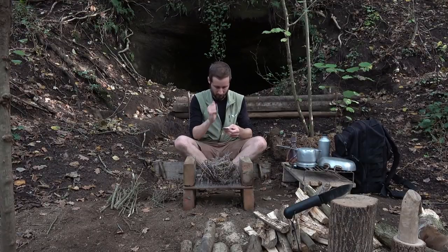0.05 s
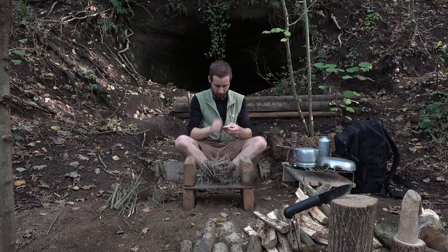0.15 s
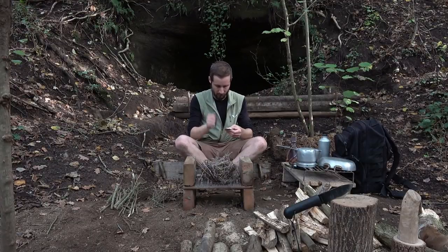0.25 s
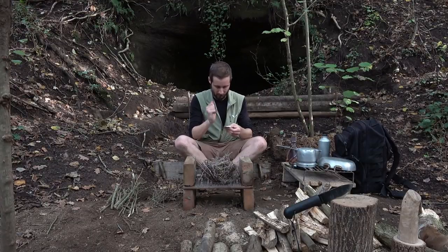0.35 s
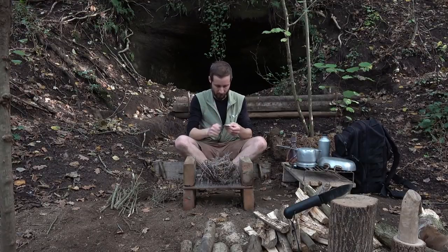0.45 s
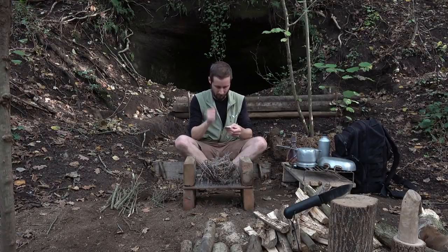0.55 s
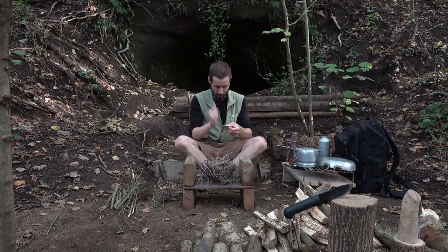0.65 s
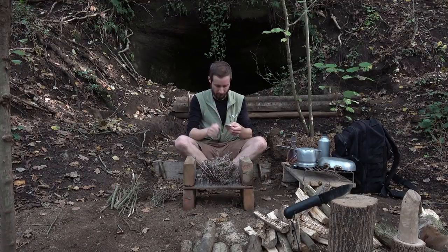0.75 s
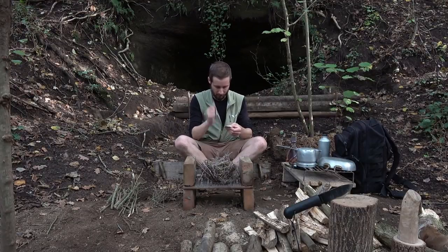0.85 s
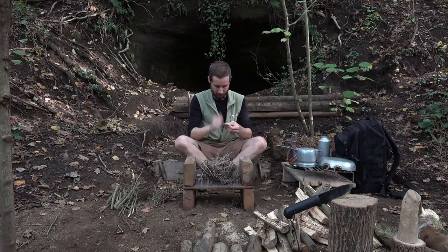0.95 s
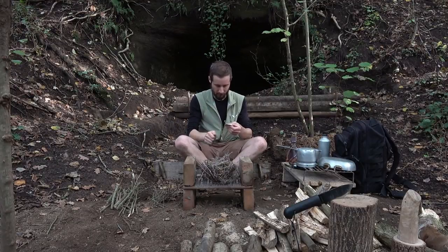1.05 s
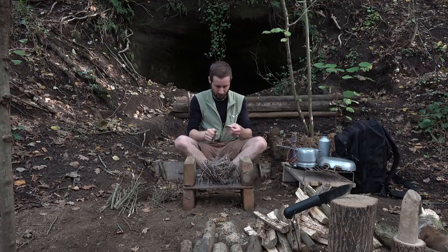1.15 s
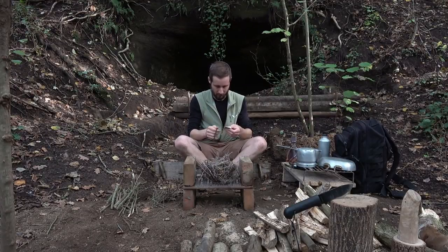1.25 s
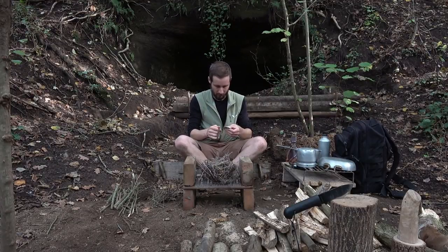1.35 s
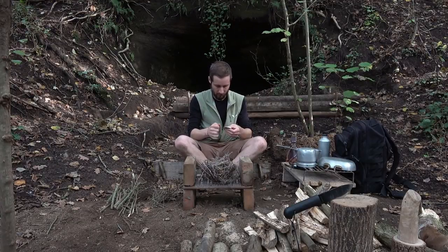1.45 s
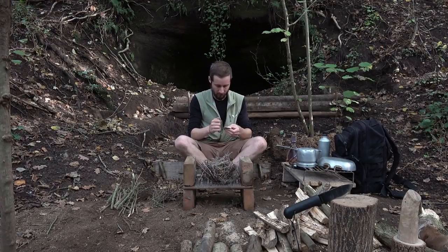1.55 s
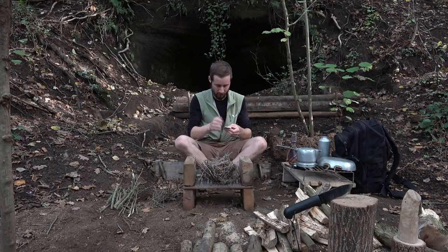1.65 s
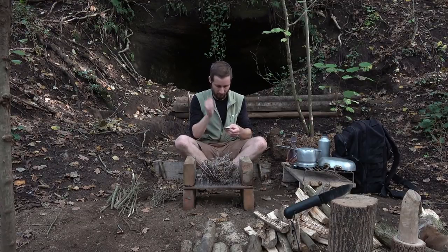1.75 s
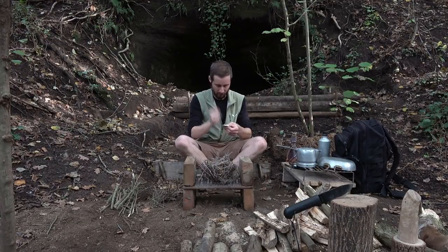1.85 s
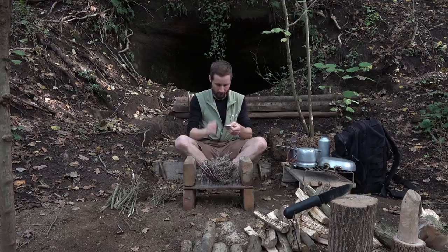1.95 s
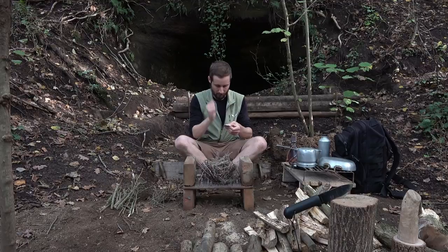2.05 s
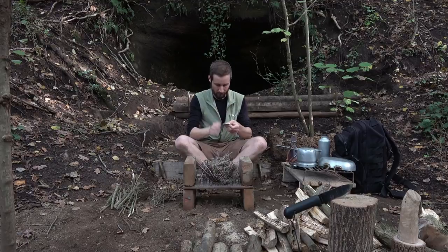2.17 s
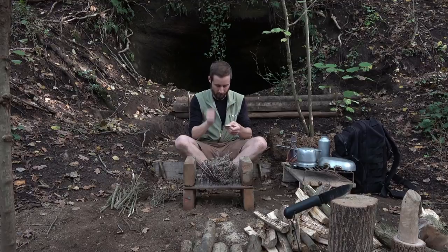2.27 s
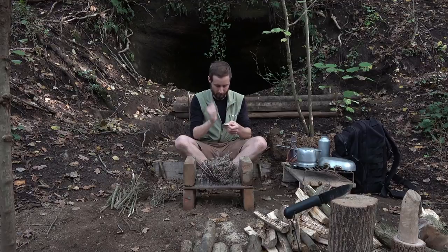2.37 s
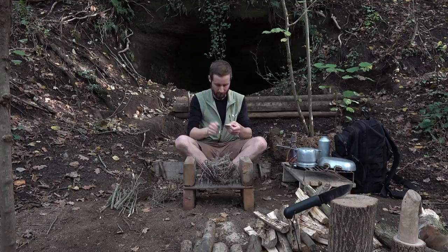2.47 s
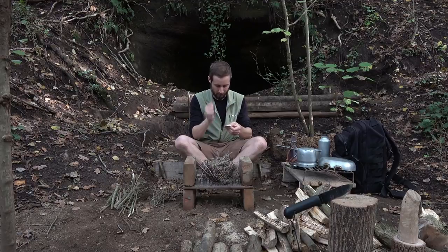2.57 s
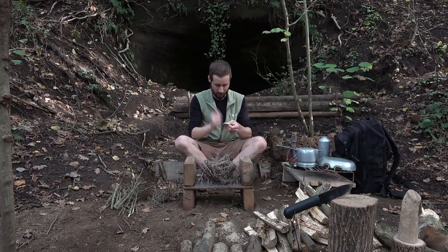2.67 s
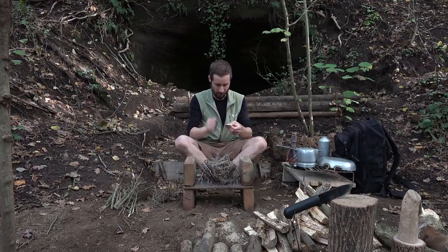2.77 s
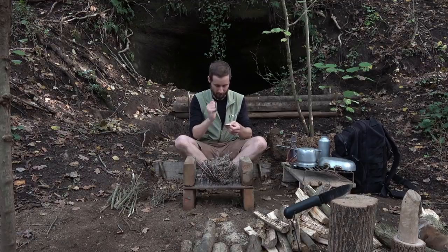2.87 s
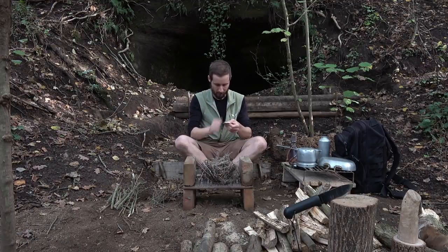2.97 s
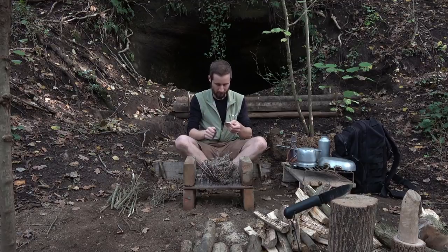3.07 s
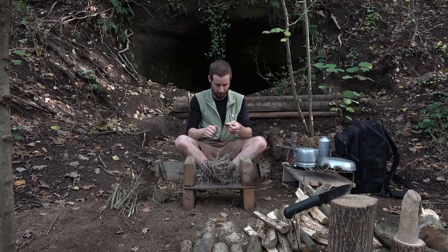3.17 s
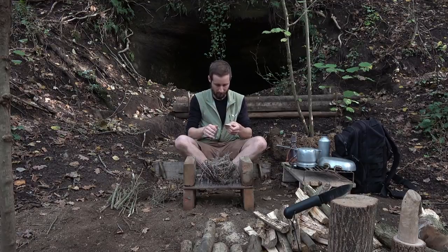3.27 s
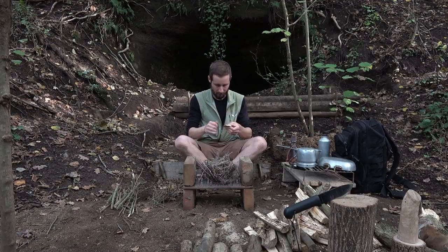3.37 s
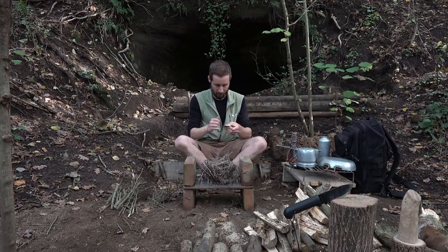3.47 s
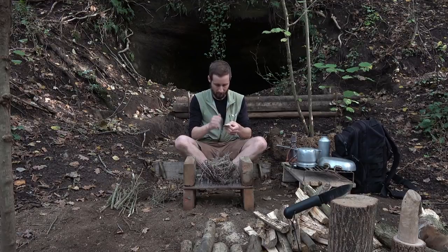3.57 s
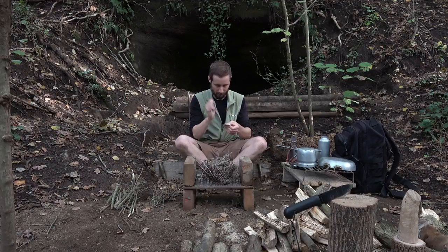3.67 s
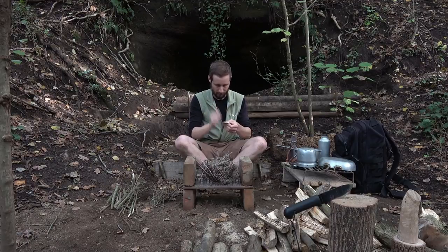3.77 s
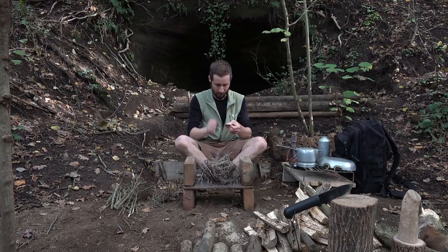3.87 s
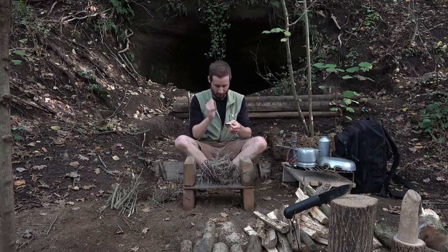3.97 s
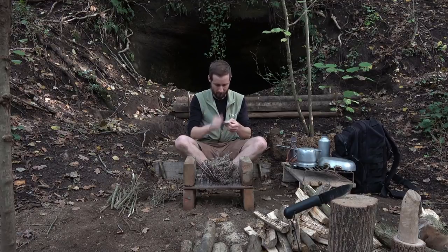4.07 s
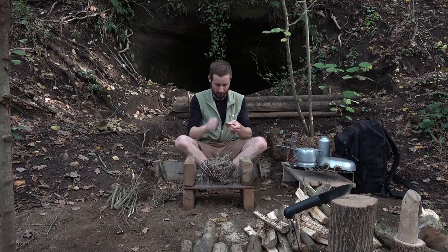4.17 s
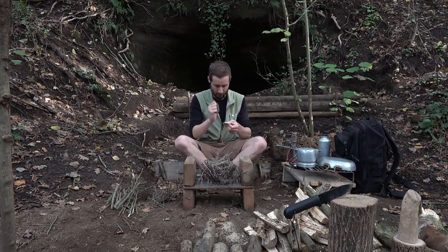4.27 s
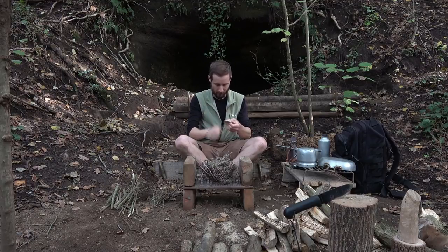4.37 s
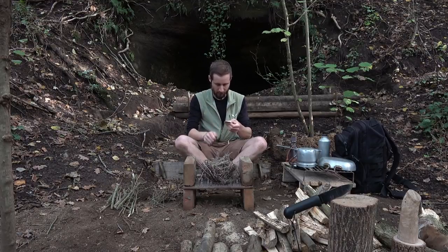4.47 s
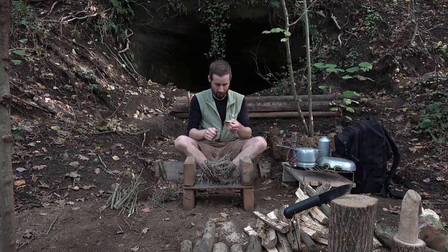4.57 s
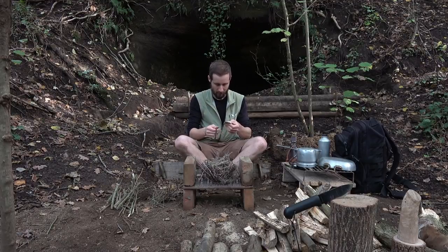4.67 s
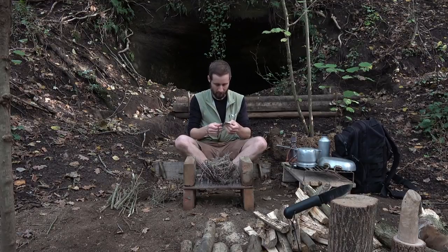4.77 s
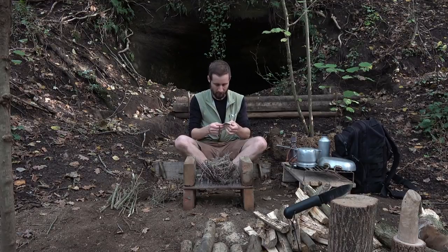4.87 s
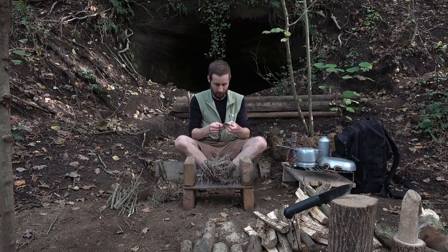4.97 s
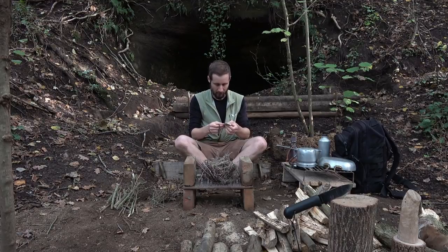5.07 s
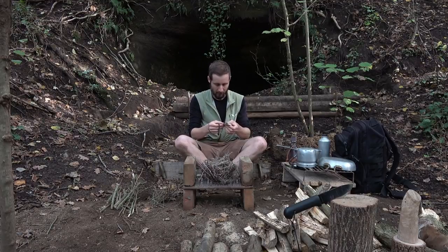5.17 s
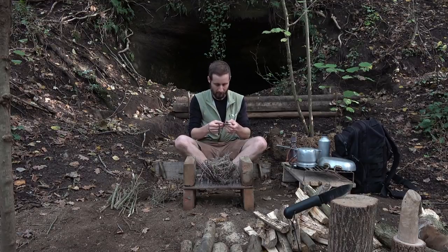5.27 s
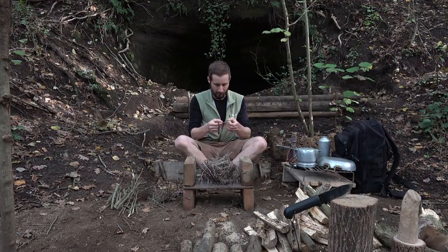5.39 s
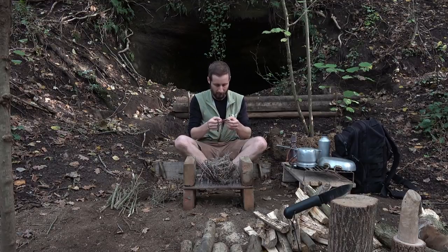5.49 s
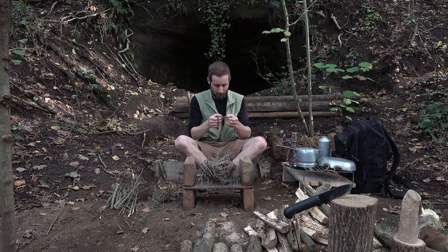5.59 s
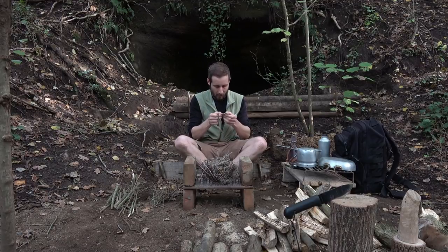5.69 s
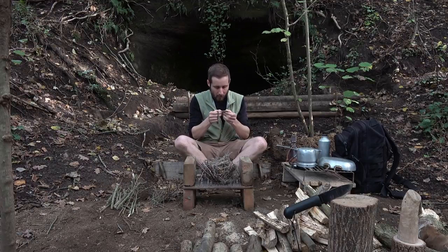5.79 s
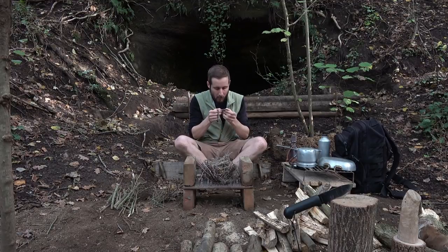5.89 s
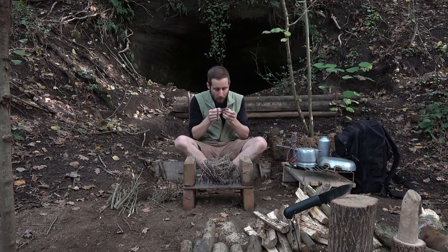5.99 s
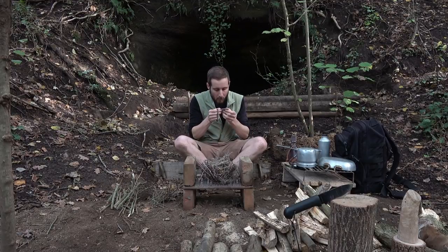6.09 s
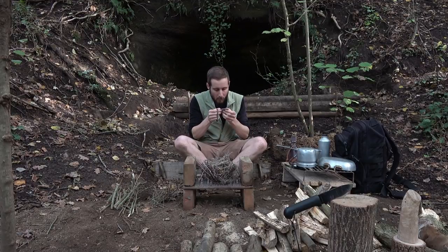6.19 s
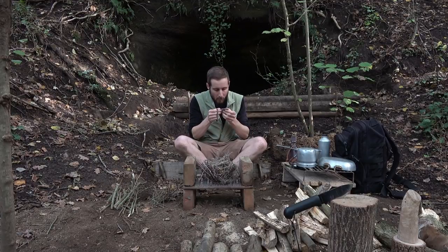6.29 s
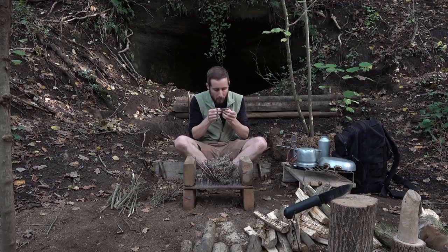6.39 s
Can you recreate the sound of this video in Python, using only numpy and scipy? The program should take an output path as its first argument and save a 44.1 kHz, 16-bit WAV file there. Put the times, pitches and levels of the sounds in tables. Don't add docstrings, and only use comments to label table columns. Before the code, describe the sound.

A steel striker cracks against flint in three quick runs of sharp, scraping metallic clicks, echoing briefly in a quiet wooded hollow.

```python
import sys
import numpy as np
from scipy import signal
from scipy.fft import rfft, irfft
from scipy.io import wavfile

SR = 44100
rng = np.random.default_rng(int(sys.argv[2]) if len(sys.argv) > 2 else 0)


def int16_out(signal):
    q = np.round(np.clip(np.atleast_2d(signal).T, -1, 1) * 32767)
    wavfile.write(sys.argv[1], SR, q.astype(np.int16))


def level_to_linear(level):
    exponent = np.asarray(level, float) / 20
    return 10 ** exponent


N = 283994
LEAD = 4410


def hard_blows():
    # t/s, bite/dB, scrape/ms, steel top over stone/dB, steel bending/dB
    blow_table = [(0.1993, -7, 32, -10, -36.5), (0.4787, -9.5, 8.1, -16.5, -24.5),
                  (0.7475, -16.5, 13, -6, -27.5), (1.0146, -15, 24, -4, -24), (1.9281, -19, 22.3, -3, -40),
                  (2.2097, -9.5, 9, -4, -18.5), (2.474, -14, 24.1, -8.5, -23), (2.7397, -18, 28, 1.4, -44),
                  (3.021, -7.5, 14.2, 5, -31), (3.844, 0.8, 4.1, -1.2, -20),
                  (4.1244, -13, 23.7, -12.5, -35), (4.3904, -16.5, 16, -13.5, -25)]
    earlier_blow = (-0.0973, -29, 11.5, -10.5, -32)
    # f/Hz, level/dB, t60/s
    stone_modes = [(560, -18, 0.005), (906, -8.5, .018), (1475, 1.5, .016), (2150, 3, 0.0077),
                   (2413, 0, 0.014), (2600, -6, .01), (3170, .6, .013), (3625, -7.5, .014)]
    # f/Hz, level/dB, t60/s
    bending_modes = [(4020, -8.5, 0.02), (4330, 0.5, 0.011), (4745, -3.5, .028), (5180, 0.5, 0.011),
                     (5536, -7, .013), (6220, -4.5, .01)]
    # f/Hz, level/dB, t60/s
    clink_modes = [(6928, -15.5, 0.011), (7175, -4.5, .03), (7320, -8, 0.042), (7338, -5, 0.022),
                   (7500, -4, .014), (7640, -11.5, 0.019), (8236, -10.5, .01), (9160, -15, 0.014)]
    # f/Hz, level/dB, t60/s
    top_modes = [(10960, -11, 0.0069), (11700, -5.5, 0.00802), (12840, -5.5, 0.012), (13700, -4.5, .008),
                 (15250, -3.5, 0.011), (15550, -1.5, .008)]
    run_starts_s = [1.5, 3.4]
    grip_db = [-2, 2.2, -.6]
    ring_follows = 0.3
    t_s, bite_db, scrape_ms, bright_db, bending_db = np.transpose([earlier_blow, *blow_table])
    body_db = -24.5 + ring_follows * bite_db
    clink_db = -17 + ring_follows * bite_db + np.take(grip_db, np.searchsorted(run_starts_s, t_s))
    stone_db, top_db = body_db - bright_db / 2, body_db + bright_db / 2
    events = np.transpose([t_s, bite_db, stone_db, bending_db, clink_db, top_db])
    contacts = []
    for db, ms in zip(bite_db, scrape_ms):
        scrape_db = max(-25 - db, -15)
        push_db = -42 + 0.25 * db
        contacts.append((3.24, ms, scrape_db, push_db, 1))
    return strike(events, contacts, [stone_modes, bending_modes, clink_modes, top_modes], spread_db=3.0)


def light_taps():
    # t/s, bite/dB, stone/dB, steel/dB, share of the free ring time
    tap_table = [
        (1.661, -31.5, -46.5, -49, .42),
        (3.569, -27, -48, -39.5, 0.83),
    ]
    # f/Hz, level/dB, t60/s
    free_modes = [
        [(928, -4.5, 0.042), (1391, 0, .025), (2890, -3, 0.018)],
        [(4300, -20, 0.025), (4780, -1, 0.069)],
        [(7340, -0.5, 0.0497), (7850, -5.5, .03), (9100, -7, .05)],
        [(12000, -2.5, 0.024), (13000, -5, .02), (15220, 0.5, 0.063)],
    ]
    events, contacts = [], []
    for t_s, bite_db, stone_db, steel_db, free in tap_table:
        events.append((t_s, bite_db, stone_db, steel_db, steel_db + 1.5, steel_db - 11))
        scrape_db = -13 + 35 * (1 - free)
        push_db = bite_db - 31
        contacts.append((3, 11, scrape_db, push_db, free))
    return strike(events, contacts, free_modes, spread_db=1.0)


def strike(events, contacts, groups, spread_db):
    # f/Hz, level/dB per Hz
    crack_spectrum = [(290, -48.5), (500, -18), (2270, -6.5), (3850, -10.5), (4520, 0), (6530, -11),
                      (7130, -9.5), (9420, -13), (9990, -24.5), (15300, -16), (16700, -38.5)]
    # f/Hz, level/dB per Hz
    grit_spectrum = [(500, -30), (1500, -11), (3300, -6), (4700, 0), (6200, -6), (7800, -1.5), (9800, -16),
                     (16000, -20)]
    crack_db = -3.5
    grit_db, grit_knee_db, grit_lag = 3.5, -14, 0.45
    far_favours_long = 0.8
    out = np.zeros((2, LEAD + N + SR))
    crack, grit = causal(crack_spectrum), causal(grit_spectrum)
    for (t_s, bite_db, *group_db), (bite_ms, scrape_ms, scrape_db, push_db, free) in zip(events, contacts):
        force = contact_force(bite_ms, scrape_ms, scrape_db)
        click = np.eye(1, len(force))[0]
        both = np.array([force, click])
        sound = alike([signal.lfilter(crack, 1, force), signal.lfilter(grit, 1, click)])
        sound *= level_to_linear(bite_db + crack_db)
        sound[1] *= level_to_linear(grit_db - grit_lag * max(bite_db - grit_knee_db, 0))
        sound += level_to_linear(push_db) * ring(click, 220, 0.012)
        for modes, level_db in zip(groups, group_db):
            rings = np.zeros_like(both)
            for k, (hz, db, t60_s) in enumerate(modes):
                vary_db = spread_db * rng.standard_normal() * np.array([[1], [0.35]])
                feed = np.array([[1], [t60_s ** far_favours_long]])
                rings += (-1) ** k * level_to_linear(db + vary_db) * ring(both, hz, t60_s * free) * feed
            sound += level_to_linear(level_db + 5.5) * alike(rings)
        at = LEAD + round(t_s * SR)
        out[:, at:at + len(force)] += sound
    return out[:, :LEAD + N]


def contact_force(bite_ms, scrape_ms, scrape_db, size=8820):
    grains_per_s = 3500
    ms = np.arange(size) / SR * 1000
    letting_go = 1 / (1 + np.exp(np.clip((ms - scrape_ms) / 1.2, -30, 30)))
    scrape = level_to_linear(scrape_db - 5 * ms / scrape_ms) * letting_go * (1 - np.exp(-ms / 3.0))
    pressure = np.exp(-ms / bite_ms) + scrape
    breaks = rng.random(size) < grains_per_s / SR
    heights = level_to_linear(2.9 * np.minimum(rng.exponential(1, size), 2.5))
    grains = breaks * heights * rng.choice([-1, 1], size)
    grains[0] = 2.58
    return pressure * grains


def ring(force, hz, t60_s):
    r, w = level_to_linear(-60 / (t60_s * SR)), 2 * np.pi * hz / SR
    return signal.lfilter([0, np.sin(w)], [1, -2 * r * np.cos(w), r * r], force + 1e-18)


def peak_one(x):
    return x / np.max(np.abs(x))


def alike(pair):
    ahead = peak_one(pair[0])
    return np.array([ahead, pair[1] * np.linalg.norm(ahead) / np.linalg.norm(pair[1])])


def at_hz(points, hz, column=1):
    points = np.array(points)
    return np.interp(np.log(np.maximum(hz, 1)), np.log(points[:, 0]), points[:, column])


def coloured(x, points):
    return irfft(rfft(x) * level_to_linear(at_hz(points, np.fft.rfftfreq(len(x), 1 / SR))), len(x))


def causal(points):
    doubled_db = np.array(points) * [1, 2]
    pulse = coloured(np.eye(1, 512)[0], doubled_db)
    return signal.minimum_phase(np.fft.fftshift(pulse)[1:])


def hollow(ahead, all_round):
    # f/Hz, level/dB, t60/s
    banks = [(300, -22.5, 0.088), (1000, -23, 0.11), (2500, -16.5, 0.17), (5000, -10, 0.16),
             (8000, -11.5, .12), (16000, -19.5, 0.11)]
    # f/Hz, level/dB, t60/s
    trunks = [(300, -38, .3), (1002, -28.5, 0.43), (2500, -24, 0.49), (5000, -16.5, .5), (8050, -25, 0.56),
              (16000, -24.5, .3)]
    # f/Hz, width/Hz
    notches = [(1130, 160), (1720, 140)]
    near = signal.fftconvolve(ahead, scatter(banks, 9.0))
    far = signal.fftconvolve(all_round, scatter(trunks, 28.0))
    for hz, width_hz in notches:
        ahead = signal.lfilter(*signal.iirnotch(hz, hz / width_hz, fs=SR), ahead)
    heard = ahead + (near + far)[:LEAD + N]
    low_cut = signal.butter(4, 190, "high", fs=SR, output="sos")
    return signal.sosfilt(low_cut, heard)[LEAD:]


def scatter(table, onset_ms):
    t, out = np.arange(SR) / SR, 0
    edges_hz = 200 * 2 ** np.arange(0, 6.6, 0.5)
    onset = 1 - np.exp(-(1000 * t / onset_ms) ** 2)
    for low, high in zip(edges_hz, edges_hz[1:]):
        hz = np.sqrt(low * high)
        fade = level_to_linear(-60 * t / at_hz(table, hz, column=2)) * onset
        sos = signal.butter(2, [low, high], "band", fs=SR, output="sos")
        band = signal.sosfilt(sos, rng.standard_normal(SR))
        out = out + level_to_linear(at_hz(table, hz)) * band * fade / np.sqrt(np.sum(fade ** 2))
    return out


def ticks():
    # t/s, peak/dB, f/Hz
    tick_table = [
        (5.51, -74, 6000),
        (5.674, -43.5, 2500),
    ]
    out = np.zeros(N)
    for t_s, db, hz in tick_table:
        force = contact_force(4.0, 5.8, 1.0, size=1500)
        snap = 0
        for ratio, ratio_db in [(0.76, -10), (0.92, 4), (1.1, 3.5), (1.3, 1), (1.55, -8)]:
            once = ring(force, hz * ratio, 0.0071)
            snap = snap + level_to_linear(ratio_db) * ring(once, hz * ratio, 0.0071)
        out[round(t_s * SR):][:1500] += level_to_linear(db) * peak_one(snap)
    return out


def wind():
    # t/s, level/dB, rise/s, fall/s
    gust_table = [
        (.7, -78.5, .4, 1.4),
        (2.2, -57.5, 0.038, 0.072),
        (2.85, -71, .4, 0.33),
        (3.63, -70.5, 0.074, .07),
    ]
    calm_db = -80
    sos = signal.butter(2, [60, 170], "band", fs=SR, output="sos")
    air = signal.sosfilt(sos, rng.standard_normal(N))
    t = np.arange(N) / SR
    level = level_to_linear(calm_db)
    for t_s, db, rise_s, fall_s in gust_table:
        level = level + level_to_linear(db) * np.exp(np.minimum((t - t_s) / rise_s, (t_s - t) / fall_s))
    return level * air / np.std(air)


def woods():
    # f/Hz, level/dB per Hz
    floor_spectrum = [(12, -26.5), (20, 0.5), (54, 1), (90, -10.5), (185, -11.5), (374, -12.5),
                      (800, -13.5), (1220, -17.5), (1700, -22), (3260, -27), (8000, -30.5), (12300, -33),
                      (15300, -35), (16200, -54.5)]
    floor_db = -70.5
    hush = coloured(rng.standard_normal(N), floor_spectrum)
    return level_to_linear(floor_db) * hush / np.std(hush)


def scene():
    struck = hard_blows() + light_taps()
    return (hollow(*struck) + ticks() + wind() + woods())[None]


def band_limit(x):
    return signal.sosfilt(signal.butter(12, 16850, fs=SR, output="sos"), x)


def record(dry):
    top_cut = signal.butter(12, 15900, fs=SR, output="sos")
    return band_limit(signal.sosfilt(top_cut, dry))


dry = scene()
out = record(dry)
int16_out(out)
```